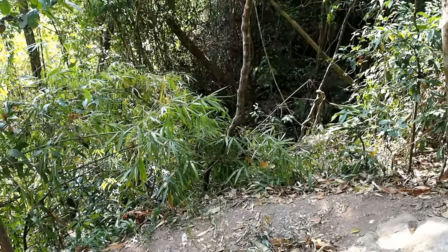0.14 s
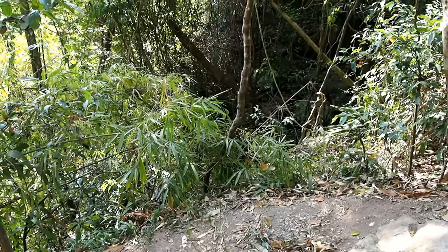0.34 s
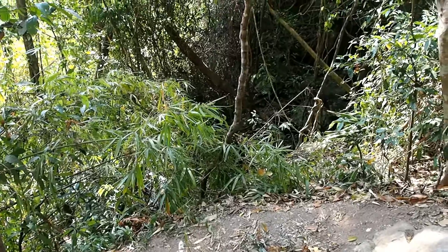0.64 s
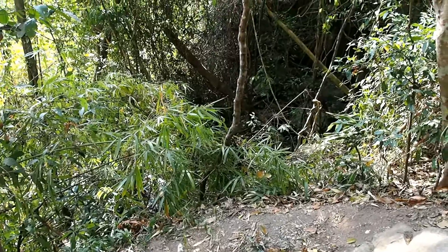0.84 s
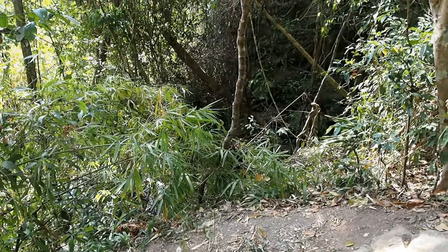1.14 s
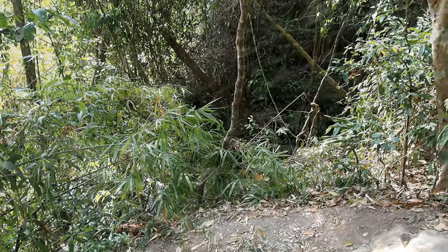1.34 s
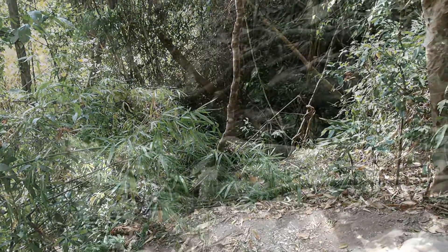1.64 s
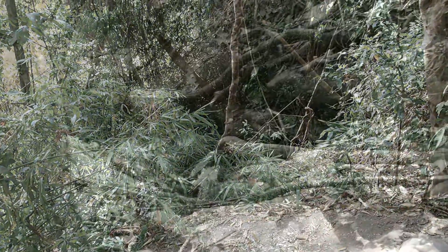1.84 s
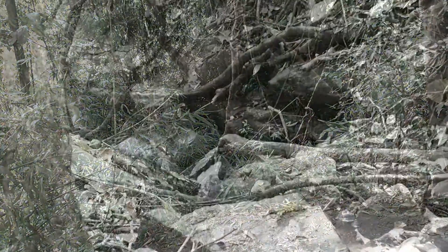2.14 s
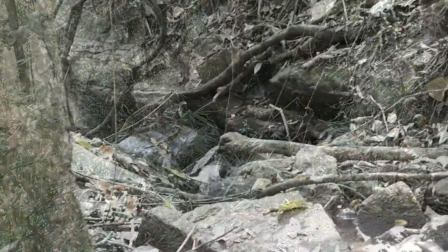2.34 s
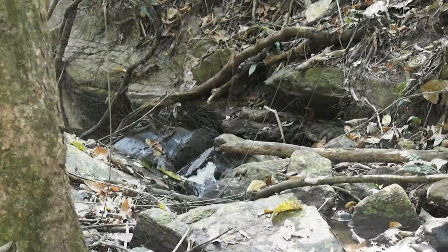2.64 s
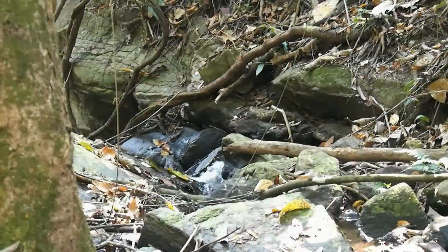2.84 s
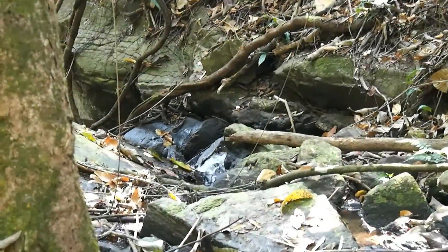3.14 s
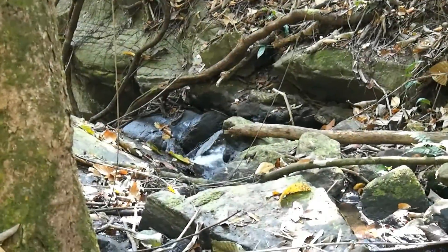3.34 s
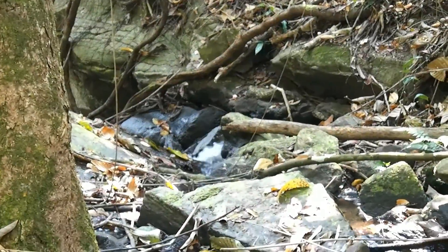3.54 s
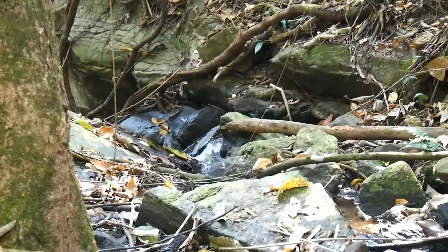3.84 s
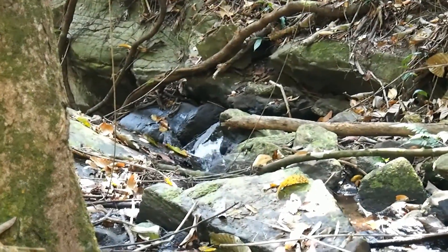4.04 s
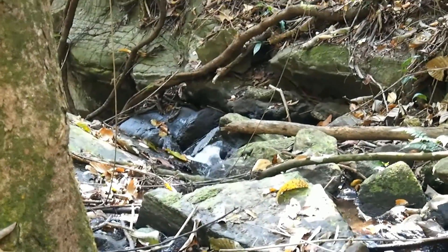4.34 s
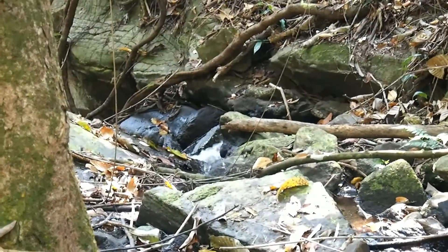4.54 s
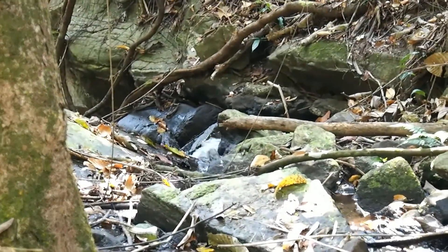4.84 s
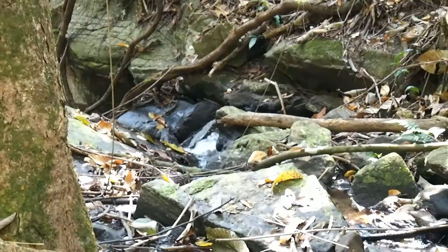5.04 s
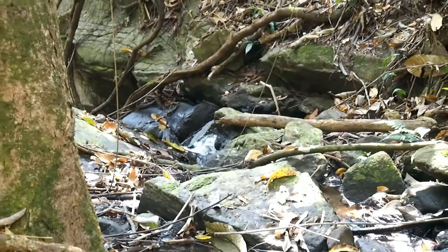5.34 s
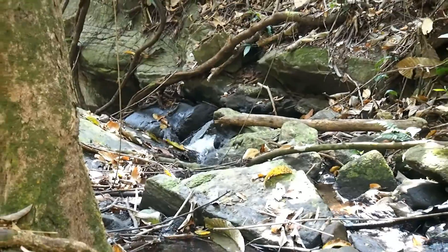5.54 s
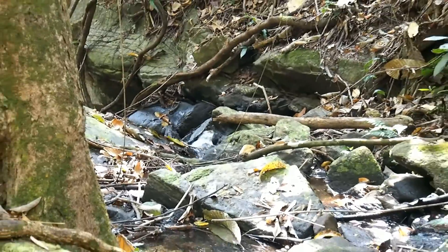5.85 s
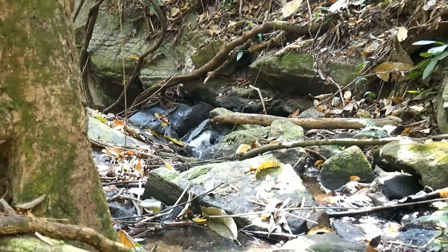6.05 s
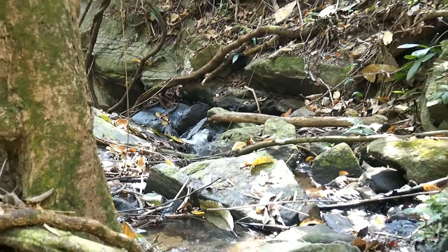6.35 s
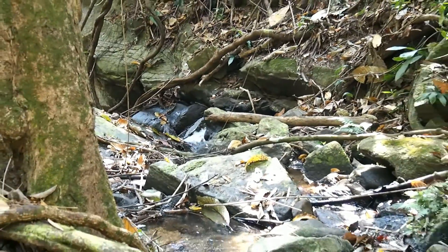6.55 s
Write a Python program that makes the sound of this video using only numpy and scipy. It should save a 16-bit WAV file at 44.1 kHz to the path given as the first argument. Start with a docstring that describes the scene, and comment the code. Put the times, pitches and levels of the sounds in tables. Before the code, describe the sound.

Close to a small rocky stream in a forest, water runs in a continuous, bubbly rush. A split-second silence and a soft low thump mark a move to another spot among the stones, where single bubbles plop more clearly and pockets of water gurgle low. The water leans slightly to the right. Beneath it, fingers lightly tap and bump the microphone housing, and a very faint motor hum joins near the end.

```python
"""Forest stream over stones

A shallow stream is heard from two spots, with a short silence between. Each bubble is a damped
oscillator: countless tiny ones merge into a rush, larger ones stand out as brief rising notes, and
pockets under the stones gurgle low. The microphones wake for the second spot with a soft thump,
right before left; later fingers tap the housing and a lens motor hums faintly."""
import sys
import numpy as np
from scipy import signal
from scipy.fft import rfft, irfft, next_fast_len
from scipy.io import wavfile

SR = 44100
rng = np.random.default_rng(int(sys.argv[2]) if len(sys.argv) > 2 else 0)


def put_to_file(sound):
    """Save the sound as 16-bit audio at rate SR, in the file named by the first command-line argument."""
    columns = np.atleast_2d(sound).T  # one column per channel
    safe = np.clip(columns, -1, 1)
    whole_steps = np.round(safe * 32767)
    wavfile.write(sys.argv[1], SR, whole_steps.astype(np.int16))


N = 295470
TIME = np.arange(N) / SR
SECOND_SPOT_S = 2


def from_db(db):
    """Amplitude ratio of a level in dB."""
    return 10 ** (np.asarray(db) / 20)


def unit_rms(x):
    """Normalisation to unit mean power."""
    return x / np.sqrt(np.mean(x ** 2) + 1e-20)


def at_hz(points, hz):
    """Interpolation on a logarithmic frequency axis."""
    known_hz, values = np.transpose(points)
    return np.interp(np.log(hz), np.log(known_hz), values)


def resonance_db(modes, hz):
    """Resonances as Lorentzian bells in dB, each given by centre, width and height."""
    return sum(top_db / (1 + (2 * (hz - centre) / width) ** 2) for centre, width, top_db in modes)


def drift(corner_hz):
    """Slow random fluctuation: noise through two one-pole low-passes, rms 1."""
    hop, run_in = 40, 2000
    pole = np.exp(-2 * np.pi * corner_hz * hop / SR)
    noise = rng.standard_normal(N // hop + run_in + 2)
    slow = signal.lfilter([1], [1, -2 * pole, pole * pole], noise)[run_in:]
    return np.interp(np.arange(N) / hop, np.arange(len(slow)), unit_rms(slow))


def damped_notes(rows, rise, samples):
    """Damped sines from rows of t/s, level/dB, f/Hz, T60/s; pitch climbs by the fraction `rise` per T60."""
    start_s, level_db, hz, t60 = np.transpose(rows)[:, :, None]
    t = np.arange(samples) / SR
    attack = 1 - np.exp(-t * hz * 0.31)
    envelope = attack * from_db(level_db - 60 * t / t60)
    tone = np.sin(2 * np.pi * hz * (t + rise * t ** 2 / t60 / 2))
    index = np.round(start_s * SR).astype(int) + np.arange(samples)
    return np.bincount(index.ravel(), (envelope * tone).ravel(), N)[:N]


def housing(force, hz=203, t60_s=.07):
    """Forced vibration of the housing's one low mode."""
    radius, angle = from_db(-60 / (t60_s * SR)), 2 * np.pi * hz / SR
    return signal.lfilter([0, np.sin(angle)], [1, -2 * radius * np.cos(angle), radius ** 2], force)


# Finger taps: t/s, level/dB
FINGER_TAPS = [(3.029, -40), (3.655, -42), (4.948, -32)]
# A hand shifting on the grip: t/s, level/dB, f/Hz, T60/s
GRIP_BUMP = [(3.96, -32, 60, 0.19)]


def handling():
    """Impact excitation: taps ring the housing and the hand thuds low, both mostly on the right."""
    impulses = np.full(N, 1e-18)
    for start_s, level_db in FINGER_TAPS:
        impulses[round(start_s * SR)] = from_db(level_db)
    bump = damped_notes(GRIP_BUMP, rise=0, samples=8000)
    return housing(impulses) * [[-.3], [1]] + bump * [[.3], [1]]


# Motor hum: harmonic number, left level/dB, right level/dB
MOTOR_HARMONICS = [(1, -71, -53.5), (2, -70, -51.5), (3, -74, -57)]


def lens_motor(start_s=4.96, rotation_hz=168.1):
    """Structure-borne sound: rotation harmonics and a housing rattle reach mostly the right side."""
    running = np.clip((TIME - start_s) / .03, 0, 1)
    hum = sum(from_db([[left_db], [right_db]]) * np.sqrt(2) * np.sin(2 * np.pi * k * rotation_hz * TIME)
              for k, left_db, right_db in MOTOR_HARMONICS)
    rattle = from_db(-53.5) * unit_rms(housing(rng.standard_normal(N)))
    waver = from_db(2.8 * drift(4.2))
    return running * (waver * hum + rattle * [[-.3], [1]])


# Surges, each among bubbles of one size: t/s, half duration/s, centre f/Hz, lift/dB
FLOW_SURGES = [(0.263, 0.2, 600, 4), (0.3, 0.12, 5000, 1.2), (1.4, .1, 5530, 0.5), (4.9, .3, 200, 4.5),
               (5.545, 0.063, 1510, 2), (6.1, 0.39, 190, 1)]


def flow_db(hz, half_octaves=1.3, settle_db=-3.5, settle_s=.12):
    """Amplitude modulation: surges Gaussian in time and pitch, and a quieter start at the second spot."""
    t = np.arange(0, N + 100, 100) / SR
    surge = sum(lift_db * np.exp(-((t - peak_s) / half_s) ** 2 - (np.log2(hz / centre) / half_octaves) ** 2)
                for peak_s, half_s, centre, lift_db in FLOW_SURGES)
    settle = settle_db * np.exp(-np.maximum(t - WAKE_TIMES[1], 0) / settle_s) * (t > SECOND_SPOT_S)
    return np.interp(TIME, t, surge + settle)


# Rush at each spot; the dip near 400 Hz is the echo off the ground: f/Hz, relative spectral level/dB
BANK_SPECTRUM = [(18, -73), (30, -28.5), (100, -10), (130, -6), (295, -1.5), (385, -13.5), (480, -8.5),
                 (570, -16), (720, -1.5), (1390, -4), (2230, -3), (4190, -7), (6210, -8.5), (9000, -13.5),
                 (13000, -19.5), (16000, -23.5)]
STONES_SPECTRUM = [(18, -56), (30, -26), (98, -12.5), (194, -6), (336, -6), (394, -13.5), (616, -1.5),
                   (1100, -4.5), (1460, -2.5), (1960, -4), (2500, -4), (3600, -8), (6210, -11),
                   (9000, -15.5), (13300, -21), (16000, -24.5)]
# Likeness of left and right: f/Hz, coherence
BANK_COHERENCE = [(60, 0.92), (180, 1), (1100, 0.95), (1450, 0.77), (2100, 0.79), (4500, 0.46), (6500, .08),
                  (15000, .05)]
STONES_COHERENCE = [(60, .91), (180, .98), (900, .96), (1900, 0.58), (2500, 0.72), (4000, 0.43),
                    (5500, .02), (15000, .05)]
# Lag of the left side: f/Hz, phase/rad
BANK_PHASE = [(400, 0), (1300, 0.18), (5000, .2)]
STONES_PHASE = [(400, 0.11), (800, .15), (1800, 0.59), (4500, 0.58)]
POCKET_HZ, POCKET_WIDTH_HZ, POCKET_DB = 207, 10, 3.4   # resonance of an air pocket among the stones


def rush(span, spray_db, spectrum, coherence, left_lag, flicker_db):
    """Incoherent summation: countless bubbles merge into noise that flickers in half-octave bands."""
    size = next_fast_len(span.stop - span.start, True)
    hz = np.maximum(np.fft.rfftfreq(size, 1 / SR), 1)
    mid, side = rfft(rng.standard_normal((2, size)))
    alike = np.clip(at_hz(coherence, hz), 0, 1)
    pair = np.sqrt(1 + alike) * mid + np.sqrt(1 - alike) * side * [[1], [-1]]
    pair *= from_db(at_hz(spectrum, hz) + resonance_db([(POCKET_HZ, POCKET_WIDTH_HZ, POCKET_DB)], hz))
    pair *= np.exp(-1j * at_hz(left_lag, hz) * [[1], [0]])
    spray = (hz > 2500) & (hz < 12000)   # this band sets the level
    pair *= size / np.sqrt(np.sum(np.abs(pair[:, spray]) ** 2))
    water, common_drift = 0, drift(2.8)[span]
    for centre in 25 * 2 ** np.arange(0, 10, .5):
        share = np.clip(1 - np.abs(2 * np.log2(hz / centre)), 0, 1)
        flicker = flicker_db * (0.38 * common_drift + drift(18.5)[span]) * (1000 / centre) ** 0.12
        band = irfft(pair * share, size)[:, :len(flicker)]
        water += band * from_db(spray_db + flow_db(centre)[span] + flicker)
    return water


def babble(count, low_hz, high_hz, cycles, spread_db, samples):
    """Superposition of bubbles random in time, size and level, each ringing `cycles` per T60; rms 1."""
    when, smallness, rank = rng.random((count, 3)).T
    hz = low_hz * (high_hz / low_hz) ** smallness
    middling_db = -40 * (smallness - .5) ** 2   # the largest and smallest are faint
    level_db = middling_db - spread_db * np.log(rank + .01)
    rows = np.c_[when * N / SR, level_db, hz, cycles / hz]
    return unit_rms(damped_notes(rows, rise=0.22, samples=samples))


def clusters_db():
    """Random modulation of level, as bubbles come in clusters."""
    return 0.9 * drift(8.7)


def fizz(shared_weight=0.45):
    """The smallest bubbles resonate highest; their sound is partly coherent between the sides."""
    shared, *own = [babble(2500, low_hz=1800, high_hz=9090, cycles=51, spread_db=2.5, samples=500)
                    for _ in range(3)]
    pair = shared_weight * shared + (1 - shared_weight) * np.array(own)
    return pair * from_db(-40 + flow_db(4000) + clusters_db())


# Distinct bubbles, gurgles under the stones and droplets ticking on stone: t/s, level/dB, f/Hz
BUBBLE_NOTES = [(0.135, -16, 990), (0.187, -25, 600), (0.248, -17, 704), (0.266, -17, 1040),
                (0.373, -20, 1700), (1.57, -18.5, 670), (2.218, -17, 1024), (2.364, -15.5, 1410),
                (2.495, -17, 1210), (2.549, -15, 1290), (2.717, -18, 602), (2.735, -22, 760),
                (2.758, -15, 896), (2.915, -20, 470), (2.932, -21, 985), (3.143, -19, 1420),
                (3.322, -16, 1420), (3.518, -20, 764), (3.629, -18, 780), (3.699, -22, 684),
                (3.712, -16, 1420), (3.783, -16, 1290), (3.81, -14, 723), (3.864, -19, 676),
                (4.005, -18, 875), (4.016, -16, 1350), (4.099, -15, 2210), (4.234, -16, 1000),
                (4.399, -18, 930), (4.854, -14, 770), (4.979, -18, 756), (4.983, -19, 524),
                (5.418, -15, 915), (5.488, -18, 1205), (5.562, -15, 1760), (5.623, -12, 1530),
                (5.931, -16, 880), (6.204, -19, 1110), (6.45, -15, 1480), (6.459, -19, 900)]
GURGLE_NOTES = [(0.197, -19, 298), (0.354, -22, 282), (1.271, -21, 261), (3.164, -23, 350),
                (3.46, -21, 193), (4.696, -24, 182), (4.783, -17.5, 189), (4.87, -21, 185),
                (5.002, -20, 198), (5.236, -27, 265), (5.637, -25, 317)]
DROPLET_TICKS = [(2.313, -27, 4750), (4.4223, -19, 5670), (4.997, -12, 6080), (6.3349, -19, 4770)]


def distinct_notes(t60_at_1khz_s=0.031):
    """Bubble resonance: deeper notes ring longer, and pitch climbs as a bubble nears the surface."""
    rows = [(start_s, level_db, hz, t60_at_1khz_s * (1000 / hz) ** .6)
            for start_s, level_db, hz in BUBBLE_NOTES + GURGLE_NOTES + DROPLET_TICKS]
    return damped_notes(rows, rise=0.067, samples=6000)


def bubbling_water():
    """Nearby bubbles, placed by arrival time: central at the first spot, to the right at the second."""
    first_spot = TIME < SECOND_SPOT_S
    small = babble(4500, low_hz=518.5, high_hz=3190, cycles=26.4, spread_db=1.5, samples=1500)
    low = babble(200, low_hz=122.3, high_hz=321, cycles=20, spread_db=-1, samples=4000)
    plump = babble(300, low_hz=559.6, high_hz=2990, cycles=41, spread_db=2.5, samples=2000)
    small *= from_db(np.where(first_spot, -40, -37.5) + flow_db(1200) + clusters_db())
    plump *= from_db(np.where(first_spot, -54, -48))
    right = small + from_db(-53.5) * low + plump + distinct_notes()
    left = np.where(first_spot, right, np.roll(right, 3))
    return np.array([left, right])


def scene():
    """Linear superposition of all sources, first on the bank, then by the stones."""
    split = SECOND_SPOT_S * SR
    bank = rush(slice(0, split), -32, BANK_SPECTRUM, BANK_COHERENCE, BANK_PHASE, flicker_db=0.5)
    stones = rush(slice(split, N), -35, STONES_SPECTRUM, STONES_COHERENCE, STONES_PHASE, flicker_db=0.68)
    return handling() + lens_motor() + np.hstack([bank, stones]) + fizz() + bubbling_water()


def wake_thump(awake_s, hz=108, decay_s=.0062):
    """Step response: the microphone bias rings once through the input high-pass and settles."""
    envelope = from_db(-17.5) * (1 - np.exp(-awake_s * 5000)) * np.exp(-(awake_s / decay_s) ** 2)
    return -envelope * np.cos(2 * np.pi * hz * awake_s)


# Microphone resonances: f/Hz, width/Hz, gain/dB
MICROPHONE_MODES = [(1620, 135, 4), (3107, 470, 4.5), (6260, 960, 4), (15000, 250, -8)]
# Channel balance: f/Hz, left minus right level/dB
BALANCE = [(60, -1.5), (400, -2), (1100, -1.3), (2100, -3.5), (3500, -3), (5300, -1.5), (6600, -3.5),
           (10000, -3.5), (15500, -4)]
# Waking of the microphones: left t/s, right t/s
WAKE_TIMES = [2.0883, 2.082]
DROPOUT_S, FADE_T60_S, CUTOFF_HZ = 1.9715, .03, 15750


def record(dry):
    """Filtering and gating: the microphones colour the sound, drop out and wake; the top is cut."""
    size = next_fast_len(N, True)
    hz = np.maximum(np.fft.rfftfreq(size, 1 / SR), 1)
    response_db = resonance_db(MICROPHONE_MODES, hz) + at_hz(BALANCE, hz) / 2 * [[1], [-1]]
    coloured = irfft(rfft(dry, size) * from_db(response_db), size)[:, :N]
    awake_s = np.maximum(TIME - np.array(WAKE_TIMES)[:, None], 0)
    fade_db = -20 * (TIME > DROPOUT_S) - 60 * np.maximum(TIME - DROPOUT_S, 0) / FADE_T60_S
    gated = coloured * np.where(awake_s > 0, 1, from_db(fade_db))
    dc_offset = -from_db(-73) * (TIME > 2.021)
    low_pass = signal.ellip(14, .3, 70, CUTOFF_HZ, fs=SR, output="sos")
    return signal.sosfilt(low_pass, gated + wake_thump(awake_s) + dc_offset)


dry = scene()
out = record(dry)
put_to_file(out)
```